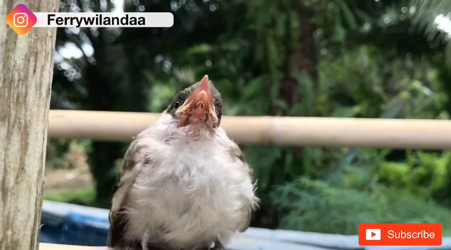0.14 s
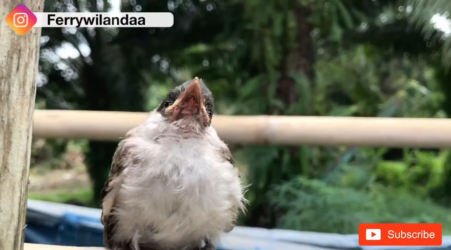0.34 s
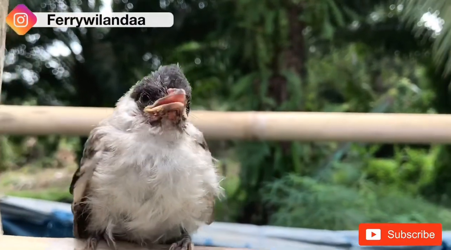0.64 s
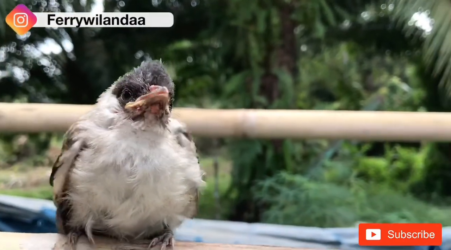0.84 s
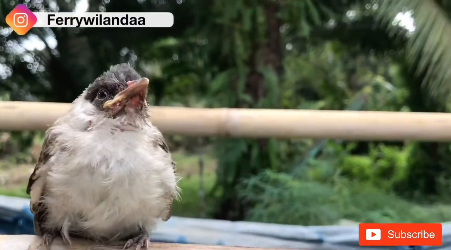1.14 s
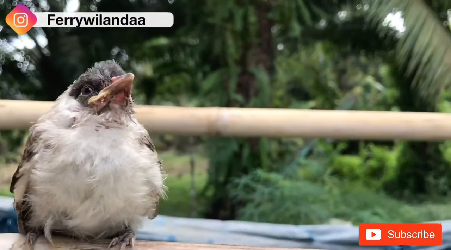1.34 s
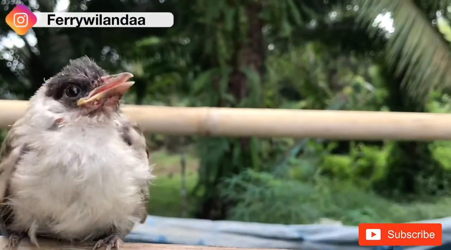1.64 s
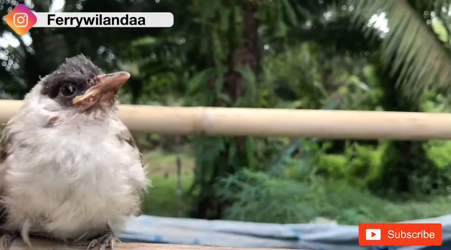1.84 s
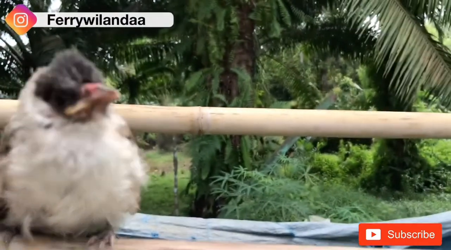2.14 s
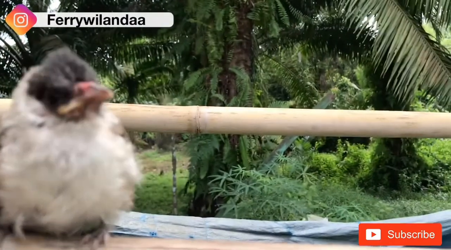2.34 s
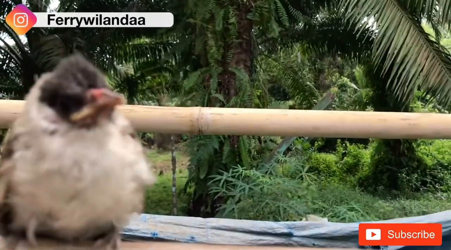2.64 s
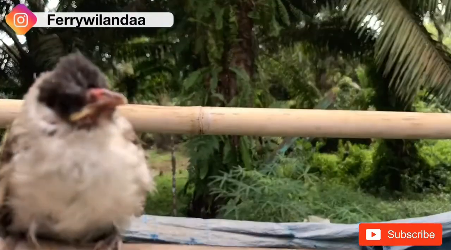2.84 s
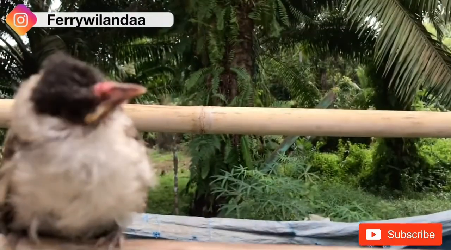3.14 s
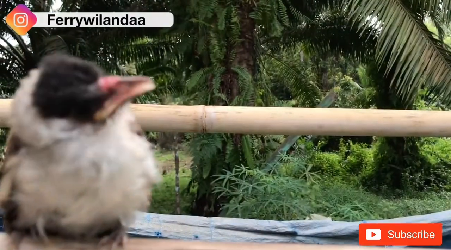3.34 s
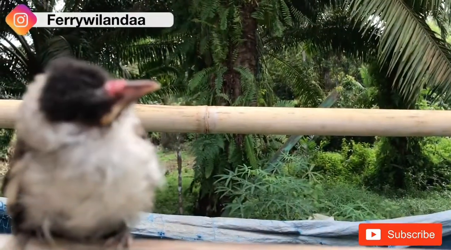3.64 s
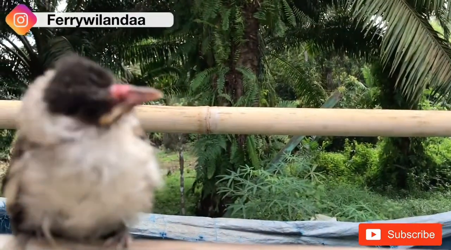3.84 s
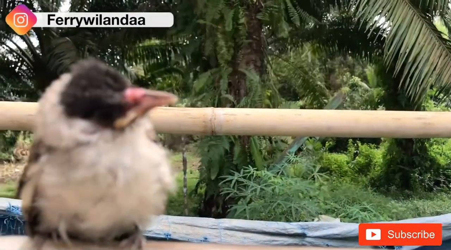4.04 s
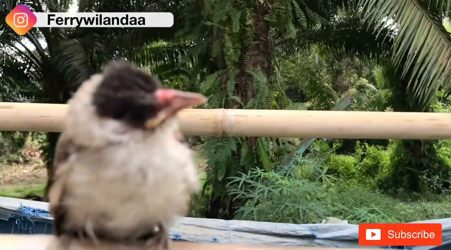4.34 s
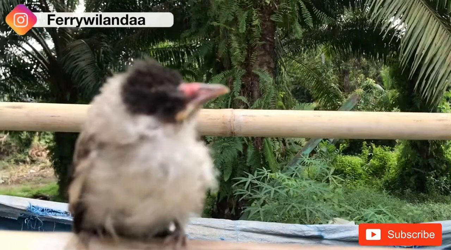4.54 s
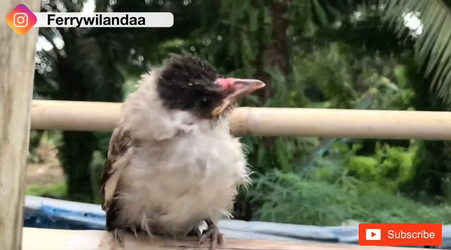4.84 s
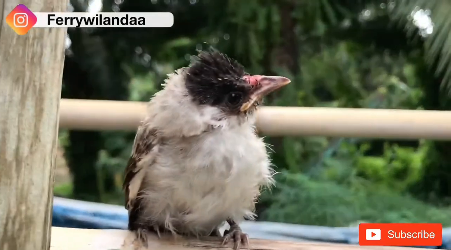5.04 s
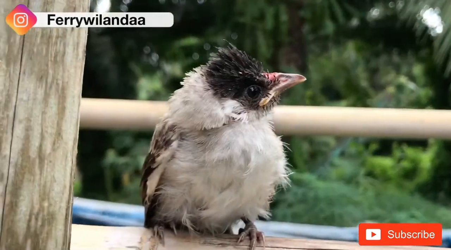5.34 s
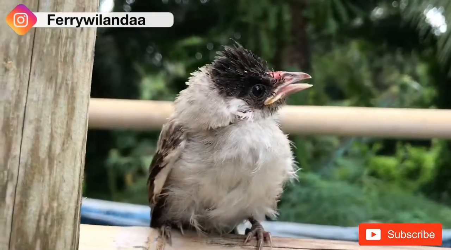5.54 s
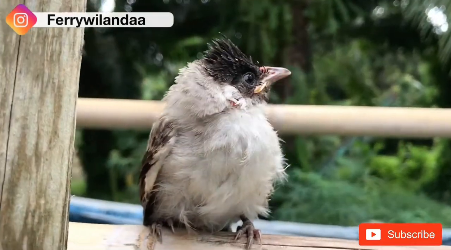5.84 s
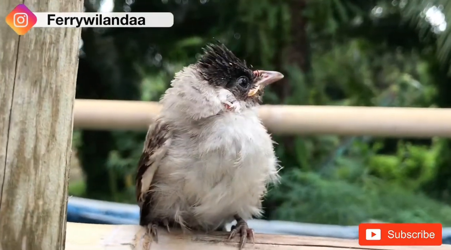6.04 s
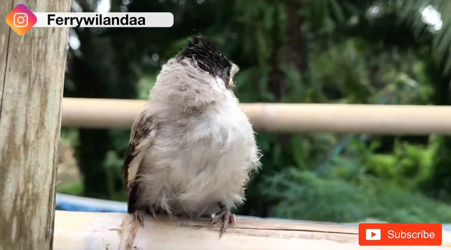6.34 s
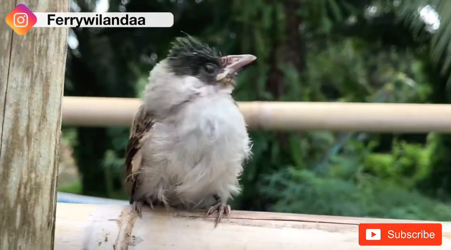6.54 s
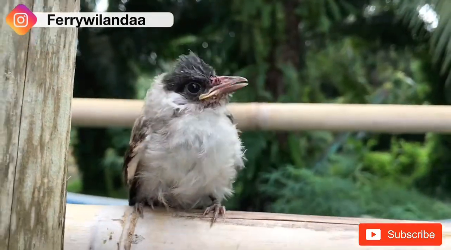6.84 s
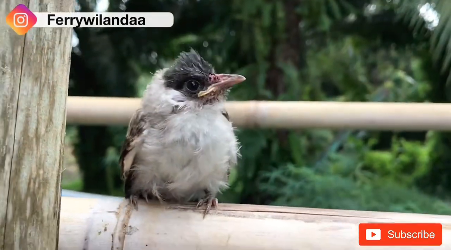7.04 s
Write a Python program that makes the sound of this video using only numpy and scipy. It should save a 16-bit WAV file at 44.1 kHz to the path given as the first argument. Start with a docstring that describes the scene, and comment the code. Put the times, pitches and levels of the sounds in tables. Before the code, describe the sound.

A young songbird chick calls close to the microphone in a garden for about seven seconds. Each call is very short, sharp and nearly dry. Rising peeps come at about 0.5, 1.3, 2.5, 3.2, 3.9, 4.7, 5.4, 6.3 and 6.7 seconds. Rougher, buzzy chirps follow right after peeps at 0.7, 1.5 and 5.6 seconds.

Everything else is much quieter. A low outdoor rumble, a light hiss of leaves and thin insect sound run throughout. A distant motor drones with a wavering tone, swelling near 2 seconds and pulsing low until about 4.7. Far birds whistle briefly just after 2 seconds, just after 5 and around 7, and a faint trill runs from 2.3 to 4.6 seconds, slowly sinking and fading. Soft scuffs and rustles occur here and there, the clearest at about 1.8 seconds.

```python
"""Bulbul chick in a garden

A chick calls close by: rising peeps and a few fast-warbled buzzes. Its syrinx pops open, catches,
scoops up to a knee in pitch and glides on, while throat and beak colour the harmonics.
Behind it far birds whistle, insects stridulate in the trees and something scuffs and rustles,
over a bed of low outdoor rumble, hissing leaves and the drone of a distant motor."""
import sys
import numpy as np
from scipy import signal
from scipy.fft import rfft, irfft
from scipy.io import wavfile

SR = 44100
rng = np.random.default_rng(int(sys.argv[2]) if len(sys.argv) > 2 else 0)


def output_pcm(signal):
    """Save a mono or channel-first signal as 16-bit PCM at the path in sys.argv[1].

    Samples are clipped to [-1, 1] before scaling.
    """
    pcm = np.clip(np.atleast_2d(signal).T, -1, 1) * 32767
    wavfile.write(sys.argv[1], SR, np.round(pcm).astype(np.int16))


N = 317079
T = np.arange(N) / SR

# tone of the outdoor rumble and of the leaves' hiss: f/Hz, relative level/dB
RUMBLE_SPECTRUM = [(15, -36), (25, -20.5), (49, 3.5), (75, -5), (102, -2), (135, -3.5), (172, -3),
                   (258, -6.5), (334, -8.5), (412, -16), (988, -27.5), (1200, -38), (1560, -57.5),
                   (2640, -120)]
LEAF_SPECTRUM = [(590, -24), (1000, -3.5), (1290, -7.5), (1650, -7.5), (1770, -8), (2280, -11.5),
                 (2980, -9), (4260, -11.5), (5020, -14.5), (7020, -12), (7700, -16.5), (9600, -14.5),
                 (10500, -22.5), (11600, -15), (16000, -27)]
# slow ride on the rumble: t/s, level before boost/dB
RUMBLE_RIDE = [(0.0, -50), (1.88, -49), (5.15, -52), (7.19, -50.5)]
# the motor's low, middle and high drone: f/Hz, width/Hz, trim/dB
MOTOR_DRONES = [(99.4, 4, -1), (139.3, 24, -2.5), (330.5, 34, -2)]
# swells of the low drone: t/s, length/s, level before trim/dB
LOW_DRONE_SWELLS = [(1.13, 0.24, -46), (1.78, 0.35, -43), (2.44, .13, -42), (2.66, 0.29, -43.5),
                    (3.13, 0.15, -40.5), (3.5, .41, -41), (4.26, .43, -43), (7.03, 0.25, -46.5)]
# ride on the upper drones, before trim: t/s, middle level/dB, high level/dB
UPPER_DRONE_RIDE = [(0, -49.0, -52.5), (0.8, -47.5, -52.5), (1.6, -46.5, -50.0), (1.95, -41, -47),
                    (2.25, -45, -45.5), (2.5, -47.5, -55.5), (4.0, -50.0, -60.5), (5.5, -54.5, -60.5),
                    (6.25, -54.5, -49), (6.8, -53.0, -59.5), (7.19, -49.0, -57)]
# insect voices: f/Hz, width/Hz, level/dB, pulse rate/Hz, throb/dB
INSECT_VOICES = [(7090, 200, -69.5, 21, 5.5), (4354, 150, -72.5, 2.2, 2), (9600, 350, -75, 9.7, 3)]
# far birds' slurred notes: t/s, length/s, first f/Hz, last f/Hz, level before trim/dB
SLURRED_NOTES = [(2.11, .025, 2050, 1500, -61), (2.132, 0.026, 2065, 2480, -50.5),
                 (2.197, .032, 2400, 1520, -53), (2.225, 0.041, 2110, 2630, -51.5),
                 (2.277, 0.068, 2740, 3500, -56.5), (5.027, 0.042, 4270, 4090, -57.5),
                 (5.246, 0.058, 6260, 5330, -54), (5.3, .086, 5040, 5240, -57),
                 (6.953, 0.067, 2140, 2360, -59.5), (7.044, .052, 1970, 2390, -55),
                 (7.137, 0.057, 2070, 2160, -56)]
# the higher a far note, the more it quavers: f/Hz, quaver/share of the pitch
QUAVER_BY_PITCH = [(2200, .014), (3200, 0.034), (6000, .04)]
# short scuffs: t/s, t60/s, low edge/Hz, high edge/Hz, level/dB
SCUFF_CUES = [(.25, .12, 700, 4160, -51.5), (1.763, 0.46, 620, 1730, -47.5),
              (2.381, .28, 2508, 4240, -50.5), (4.377, .08, 1200, 6950, -53.5),
              (5.905, .07, 4000, 8900, -58)]
# soft rustles: t/s, swell/s, level/dB
RUSTLE_CUES = [(1.1, .07, -60), (1.775, 0.093, -50), (2.299, 0.15, -57), (3.51, .02, -62), (4.06, .09, -56)]
# the chick's harmonics from the fundamental up, even ones strongest:
# base level/dB, growth/dB per dB of pressure
SYRINX_HARMONICS = [(-24.5, 0.44), (1, 0.85), (-22.5, 1.2), (0.5, 1.5), (-7.5, 1.5), (-5, 1.3),
                    (-11.5, 1.6), (-4, 1.4), (-20, 1.8), (-11.5, 1.9)]
# throat and beak make each harmonic swell and fade as it glides: f/Hz, relative gain/dB
THROAT_RESPONSE = [(1200, -8), (1600, 0), (2400, -4.5), (3100, -1.5), (3800, -1.5), (4400, -13),
                   (5200, 1.5), (5900, 9), (6500, 8.5), (7400, 3), (9500, -1), (10500, -4.5), (12200, 2.5),
                   (14500, -17.5), (16000, -6)]
# the pitch overshoots the knee and sags back: t from the knee/s, pitch offset/Hz
KNEE_OVERSHOOT = [(-.016, -0.5), (-.008, -25.5), (0, 23.5), (.012, -27), (.03, 11), (.042, -3)]
# air pressure through a peep and through a buzz: t/share of the call, pressure/dB
PEEP_BREATH = [(0, -29.5), (.08, -21), (.14, -9.5), (.25, -1), (.45, -.5), (.71, -1), (.82, -3.5),
               (.91, -10), (1, -26.5)]
BUZZ_BREATH = [(0, -21), (.12, -9.5), (.25, -1), (.45, -1.5), (.72, -1.5), (.85, -7.5), (1, -20)]
# rising peeps: t/s, length/s, knee f/Hz, end f/Hz, warble depth/Hz, warble rate/Hz, gain/dB,
# brightness/dB, brightening over the call/dB
PEEP_CUES = [(0.495, .081, 1482, 1671, 6, 190, -19.5, 7, 25),
             (1.33, 0.077, 1545, 1834, 26, 104, -19, 4, 4.5),
             (2.493, 0.077, 1670, 1948, 48, 90, -17, -6.5, 6),
             (3.248, .081, 1496, 1667, 9.2, 105, -19, 5.5, 3.5),
             (3.872, 0.076, 1552, 1735, 48, 122, -19, 1, 8),
             (4.667, 0.081, 1497, 1613, 9.4, 92, -20.5, 7, 11),
             (5.441, 0.081, 1453, 1673, 8, 92, -21, 4, 6),
             (6.3, .078, 1420, 1652, 42, 39, -22.5, -3.2, -5.5),
             (6.716, 0.08, 1611, 1763, 12, 105, -20, 1, 16)]
# buzzes: t/s, length/s, rise/s, knee f/Hz, warble depth/Hz, warble rate/Hz, gain/dB, brightness/dB
BUZZ_CUES = [(0.696, 0.078, 0.024, 1415, 66.2, 150, -22.5, 6),
             (1.4986, 0.074, .0255, 1492, 150, 133, -23, 12.5),
             (5.569, 0.059, .0215, 1490, 180, 139, -23, 4)]


def from_db(db):
    """Decibels to gain."""
    return 10 ** (np.asarray(db) / 20)


def rms_one(x):
    """Scale to rms 1."""
    return x / np.sqrt(np.mean(x ** 2) + 1e-20)


def read(rows, at):
    """Look up a curve by its first column; every other column is joined by straight lines."""
    key, *columns = np.transpose(rows)
    return [np.interp(at, key, column) for column in columns]


def add(out, start, sound):
    """Mix a sound in at a start time in seconds."""
    i = max(round(start * SR), 0)
    out[i:i + len(sound)] += sound[:max(N - i, 0)]


def gate(start, end, attack, release):
    """Fade in, hold and fade out between two times."""
    return np.clip(np.minimum((T - start) / attack, (end - T) / release), 0, 1)


def phase_of(pitch):
    """Running phase of an oscillator that follows a pitch in Hz."""
    return 2 * np.pi * np.cumsum(pitch) / SR


def band_noise(n, low_hz, high_hz):
    """Noise between two edges, rms 1."""
    sos = signal.butter(2, [low_hz, np.clip(high_hz, low_hz + 1, .45 * SR)], "band", fs=SR, output="sos")
    return rms_one(signal.sosfilt(sos, rng.standard_normal(n + SR // 10))[-n:])


def drift(n, rate):
    """Smooth random modulation that changes about rate times a second, rms 1."""
    pole = np.exp(-2 * np.pi * rate / SR)
    smooth = signal.lfilter([1], [1, -2 * pole, pole * pole], rng.standard_normal(n + SR // 10))
    return rms_one(smooth[-n:])


def coloured_noise(spectrum):
    """Steady noise with the given spectrum, rms 1."""
    hz, db = np.transpose(spectrum)
    gain = from_db(np.interp(np.log(np.fft.rfftfreq(N, 1 / SR) + 1), np.log(hz), db))
    return rms_one(irfft(rfft(rng.standard_normal(N)) * gain, N))


def garden_reverb(x, wet_db, t60=.24):
    """Leaves and posts scatter a faint, short tail."""
    t = np.arange(SR // 2) / SR
    tail = band_noise(len(t), 800, 6500) * np.exp(-np.log(1000) * t / t60) * np.clip(t / .006, 0, 1)
    return x + from_db(wet_db) * signal.fftconvolve(x, tail / np.linalg.norm(tail))[:N]


def air(rumble_boost_db=6, leaves_db=-60, waver_db=2):
    """The bed: low outdoor rumble and the hiss of leaves."""
    ride_db, = read(RUMBLE_RIDE, T)
    rumble = from_db(ride_db + rumble_boost_db) * coloured_noise(RUMBLE_SPECTRUM)
    leaves = from_db(leaves_db + waver_db * drift(N, 1)) * coloured_noise(LEAF_SPECTRUM)
    return rumble + leaves


def motor():
    """A distant motor: three wavering drones, the lowest swelling in spells above its idle."""
    out = np.zeros(N)
    hum = from_db(-57.5)
    for start, length, db in LOW_DRONE_SWELLS:
        hum = np.maximum(hum, from_db(db) * gate(start, start + length, attack=.07, release=.044))
    levels = [hum, *from_db(read(UPPER_DRONE_RIDE, T))]
    for level, (hz, width, trim_db) in zip(levels, MOTOR_DRONES):
        drone = np.sqrt(2) * np.sin(phase_of(hz + width / 2 * drift(N, width)))
        out += level * from_db(trim_db + 1.8 * drift(N, width / 2)) * drone
    return out


def insects(bend_hz=90):
    """Narrow bands of stridulation; each pulse swells and bends the pitch."""
    out = np.zeros(N)
    for hz, width, db, rate, throb_db in INSECT_VOICES:
        pulse = np.sin(2 * np.pi * rate * T + 2 * drift(N, rate / 4))
        pitch = hz + width / 2 * drift(N, width) + bend_hz * (pulse - .5)
        out += from_db(db + throb_db * pulse + 2 * drift(N, width / 2)) * np.sin(phase_of(pitch))
    return out


def far_trill(start=2.27, end=4.65, notes_per_s=11, hz=2416, sag_hz_per_s=77, fade_db_per_s=1.2):
    """A far bird's long, pulsing trill sinks and fades as it goes."""
    since = T - start
    beat = np.sin(2 * np.pi * notes_per_s * T + 1.8 * drift(N, 2))
    blur = 1 + .036 * drift(N, 300) + .013 * drift(N, 12)
    pitch = (hz - sag_hz_per_s * since + 80 * (beat - .5)) * blur
    level = from_db(-64.5 - fade_db_per_s * since + 3 * drift(N, 6)) * gate(start, end, .15, .15)
    return level * (1 + .45 * beat) * np.sin(phase_of(pitch))


def far_whistles(arch_hz=70, trim_db=-1):
    """Far birds whistle short slurs that arch and quaver."""
    out = np.zeros(N)
    for start, length, first_hz, last_hz, db in SLURRED_NOTES:
        share = np.linspace(0, 1, int(length * SR))
        arch = np.sin(np.pi * share)
        pitch = first_hz + (last_hz - first_hz) * share + arch_hz * arch
        quaver, = read(QUAVER_BY_PITCH, pitch)
        pitch *= 1 + quaver * drift(len(share), 600)
        add(out, start, from_db(db + trim_db) * arch * np.sin(phase_of(pitch)))
    return out


def friction(swell, t60, low_hz, high_hz, grain_db):
    """Grainy friction noise that swells and dies."""
    t = np.arange(int((swell + t60) * SR)) / SR
    envelope = np.minimum(t / swell, 1) * np.exp(-np.log(1000) * np.maximum(t - swell, 0) / t60)
    return envelope * from_db(grain_db * drift(len(t), 200)) * band_noise(len(t), low_hz, high_hz)


def rustles():
    """Something rubs nearby: sudden scuffs and slower, brighter rustles."""
    out = np.zeros(N)
    for start, t60, low_hz, high_hz, db in SCUFF_CUES:
        add(out, start, from_db(db) * friction(.004, t60, low_hz, high_hz, grain_db=3))
    for start, swell, db in RUSTLE_CUES:
        add(out, start, from_db(db) * friction(swell, t60=.4, low_hz=2300, high_hz=11000, grain_db=2))
    return out


def syrinx_pitch(length, rise, glide, depth, rate, fade_per_s, rough):
    """The syrinx catches high, dips to the scoop, climbs to the knee, then glides on, warbling."""
    scoop, knee, middle, end = glide
    t = np.arange(int(length * SR)) / SR
    n, since_knee = len(t), t - rise
    contour = np.interp(t, [.12 * rise, .36 * rise, rise, (rise + length) / 2, length],
                        [1.07 * knee, scoop, knee, middle, end])
    overshoot, = read(KNEE_OVERSHOOT, since_knee)
    # the warble sets in just before the knee; no two swings are alike, and the last ones die away
    onset = np.clip(1.4 + 2.4 * since_knee / rise, 0, 1)
    fade = np.exp(-np.maximum(since_knee, 0) * fade_per_s)
    release = np.clip((length - t) / .011, 0, 1) ** 2
    swing = depth * onset * fade * release * (1 + .28 * drift(n, 90))
    warble = swing * np.cos(2 * np.pi * rate * since_knee + .35 * drift(n, 60))
    flutter = 1 + (.0024 + .012 * rough) * band_noise(n, 38, 130)
    return (contour + overshoot + warble) * flutter


def syrinx_voice(length, pitch, breath, rough, pop_db, fourth_db, top_db, brighten_db):
    """Air pressure drives the membranes; throat and beak shape their harmonics."""
    n = len(pitch)
    t = np.arange(n) / SR
    share = t / length
    pressure_db, = read(breath, share)
    # the membranes are unsteady until they lock, and stay so in a buzz
    catching = np.exp(-(t / .01) ** 4)
    rasp = (.016 * rough + .071 * (1 - rough) * catching) * drift(n, 1100)
    phase = phase_of(pitch * (1 + rasp))
    tone = np.zeros(n)
    for k, (harmonic_db, growth) in enumerate(SYRINX_HARMONICS, 1):
        throat_db, = read(THROAT_RESPONSE, k * pitch)
        db = harmonic_db + growth * pressure_db + throat_db - throat_db[n // 4:3 * n // 4].mean()
        if k == 4:
            db += fourth_db + brighten_db * np.clip(share - .5, -.25, .15)
        if k > 4:
            shimmer_db = (2 + 3 * rough) * drift(n, 270)
            db += top_db + (brighten_db - 9) * (share - .5) + shimmer_db
        tone += from_db(db) * np.sin(k * phase)
    # turbulence in the open beak follows the pressure and the overtones
    turbulence = band_noise(n, 6500, 15800) + .45 * band_noise(n, 1500, 6500)
    hiss = rough * from_db(top_db - 10 + .7 * pressure_db) * turbulence
    # the syrinx opens with a small pop, brighter in a buzz, and scratches until it locks
    pop_envelope = t / .0018 * np.exp(1 - t / .0018)
    pop = from_db(pop_db) * pop_envelope * (np.sin(2 * phase) + 1.5 * rough * np.sin(4 * phase))
    scratch_envelope = np.exp(-((t - .008) / .003) ** 2)
    scratch = from_db(-13.5) * (1 - rough) * scratch_envelope * band_noise(n, 2400, 4100)
    edge_fades = np.clip((length - t) / .003, 0, 1) * np.clip(t / .001, 0, 1)
    return (np.sqrt(2) * tone + hiss + pop + scratch) * edge_fades


def peep(length, knee, end, depth, rate, gain_db, bright_db, brighten_db):
    """A rising call; its pitch sets its shape, and the more it warbles the rougher it is."""
    typical_knee_hz, typical_end_hz = 1520, 1754
    # a higher peep starts higher, reaches its knee sooner and sags in mid glide; a lower one bows up
    scoop = 1340 + .36 * (end - typical_end_hz)
    rise = .0212 * (typical_knee_hz / knee) ** 1.4
    middle = (knee + end) / 2 - .27 * (knee - typical_knee_hz)
    rough = .12 + .0025 * abs(depth)
    pitch = syrinx_pitch(length, rise, (scoop, knee, middle, end), depth, rate, fade_per_s=12, rough=rough)
    voice = syrinx_voice(length, pitch, PEEP_BREATH, rough, pop_db=-18, fourth_db=bright_db,
                         top_db=-20 + .83 * bright_db, brighten_db=brighten_db)
    return from_db(gain_db) * voice


def buzz(length, rise, knee, depth, rate, gain_db, bright_db, scoop_hz=1267, rough=.6):
    """A rough call that sinks after its knee and warbles widely to its end."""
    glide = (scoop_hz, knee, .98 * knee, .885 * knee)
    pitch = syrinx_pitch(length, rise, glide, depth, rate, fade_per_s=0, rough=rough)
    voice = syrinx_voice(length, pitch, BUZZ_BREATH, rough, pop_db=-10.5, fourth_db=bright_db,
                         top_db=-13 + .432 * bright_db, brighten_db=0)
    return from_db(gain_db) * voice


def chick():
    """The lead voice: every peep and buzz on its cue."""
    out = np.zeros(N)
    for start, *settings in PEEP_CUES:
        add(out, start, peep(*settings))
    for start, *settings in BUZZ_CUES:
        add(out, start, buzz(*settings))
    return out


def scene():
    """A centred mono mix: the chick almost dry up front, the far birds blurred by foliage."""
    near_chick = garden_reverb(chick(), wet_db=-36)
    far_birds = garden_reverb(far_trill() + far_whistles(), wet_db=-8)
    mono = near_chick + far_birds + rustles() + motor() + insects() + air()
    return np.array([mono, mono])


def record(dry):
    """A low cut takes out the deepest rumble, and a steep high cut the very top."""
    low_cut = signal.butter(2, 30, "high", fs=SR, output="sos")
    high_cut = signal.ellip(12, .1, 80, 15880, fs=SR, output="sos")
    return signal.sosfilt(high_cut, signal.sosfilt(low_cut, dry))


dry = scene()
out = record(dry)
output_pcm(out)
```